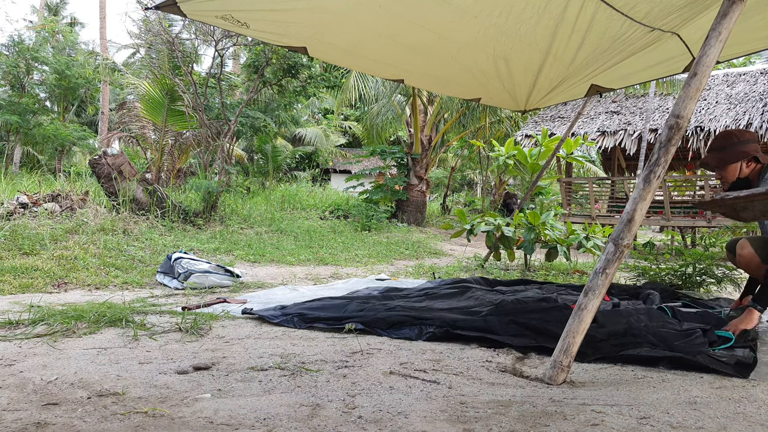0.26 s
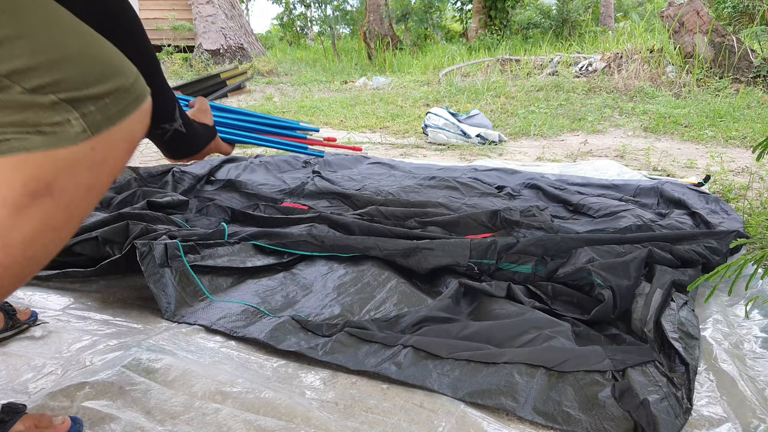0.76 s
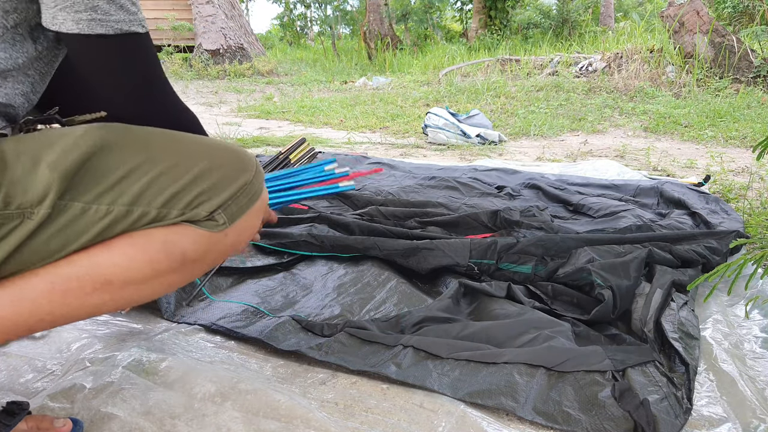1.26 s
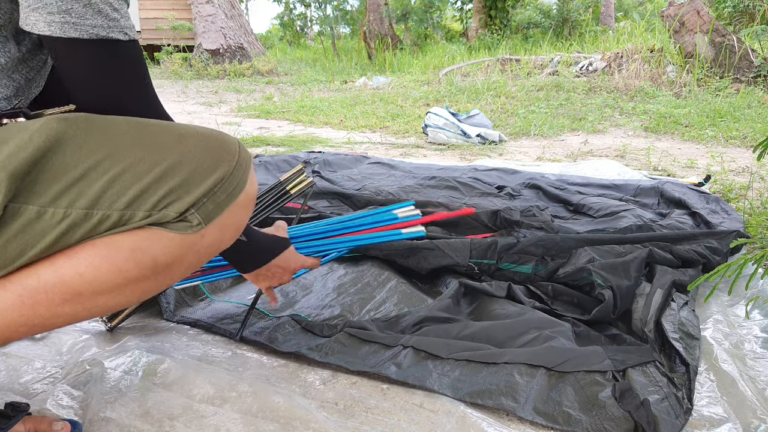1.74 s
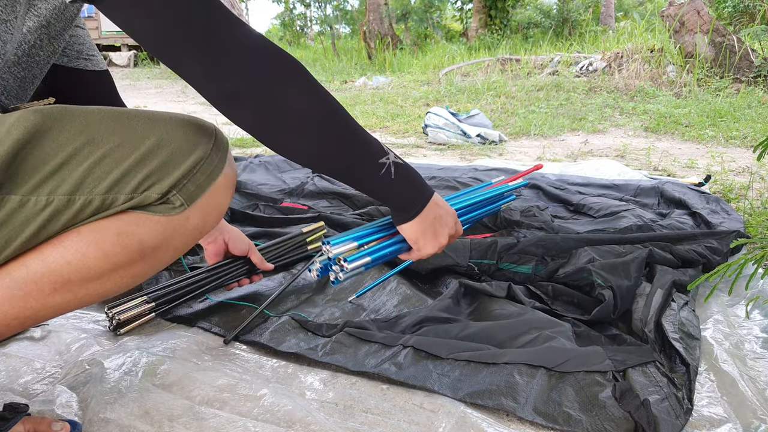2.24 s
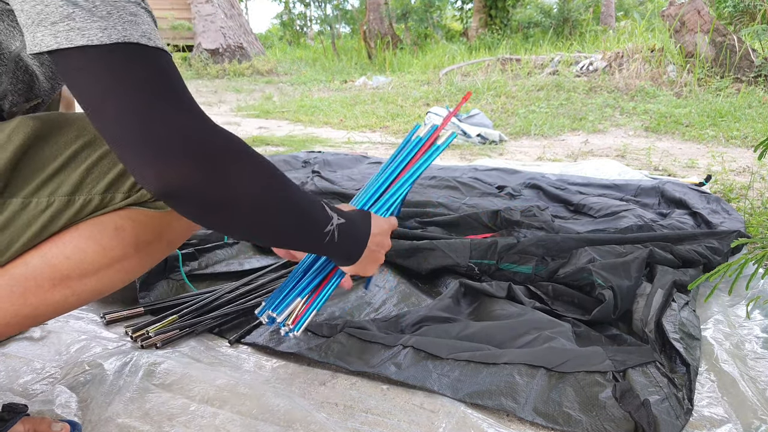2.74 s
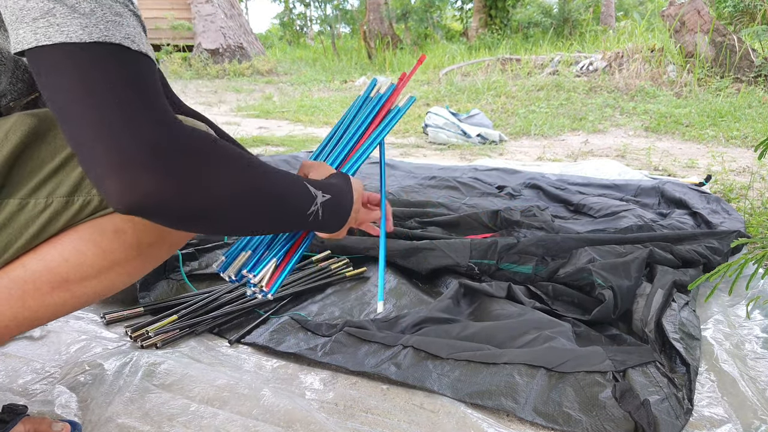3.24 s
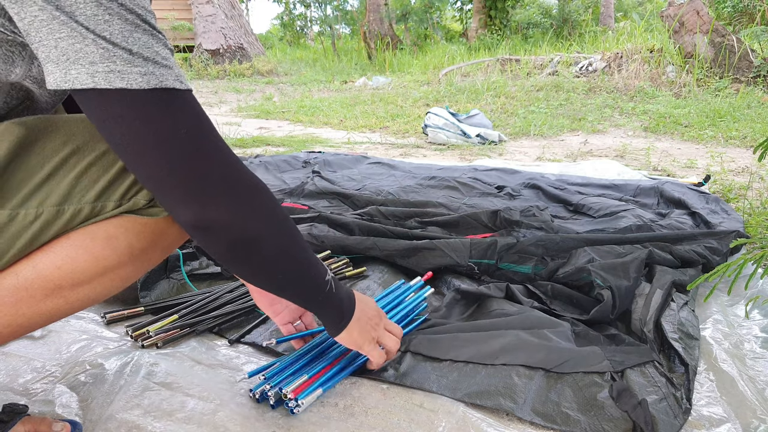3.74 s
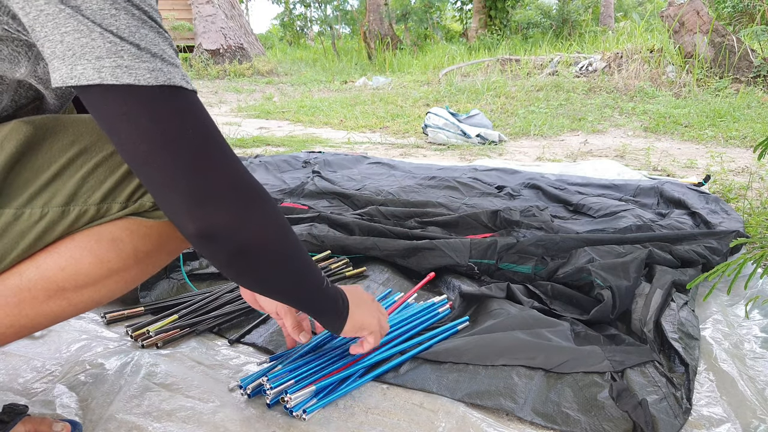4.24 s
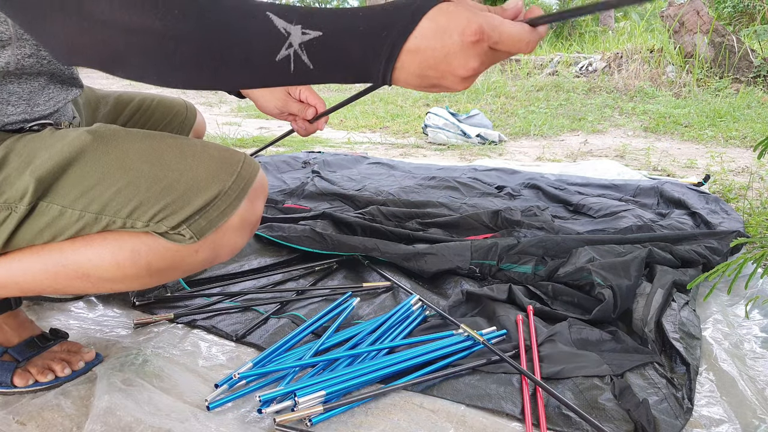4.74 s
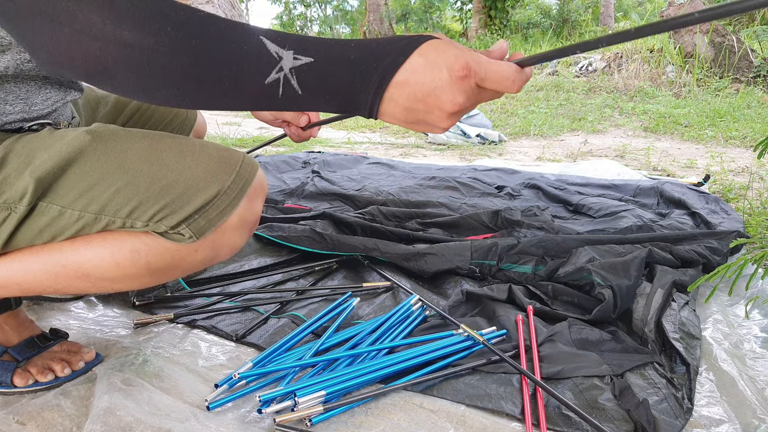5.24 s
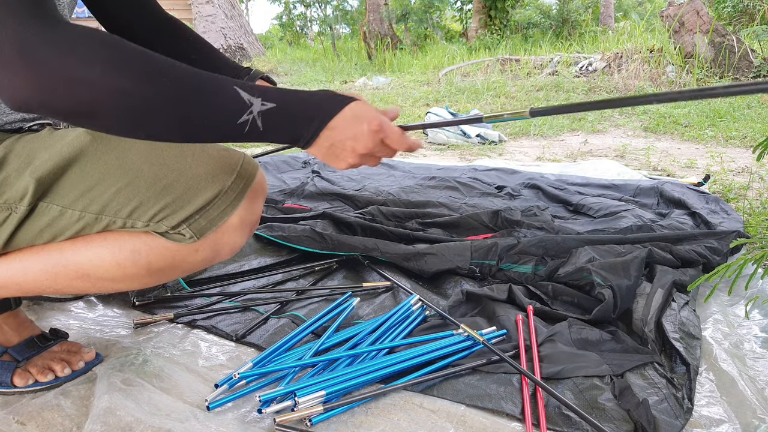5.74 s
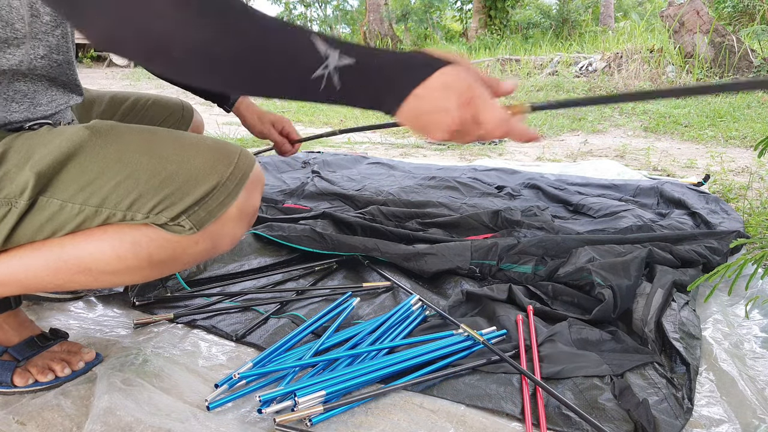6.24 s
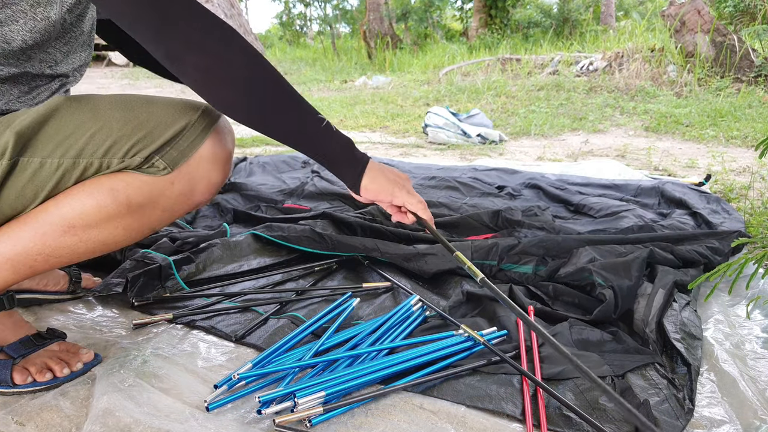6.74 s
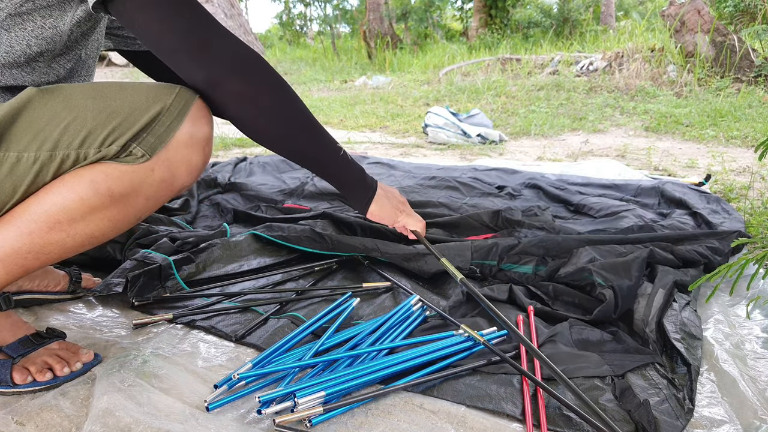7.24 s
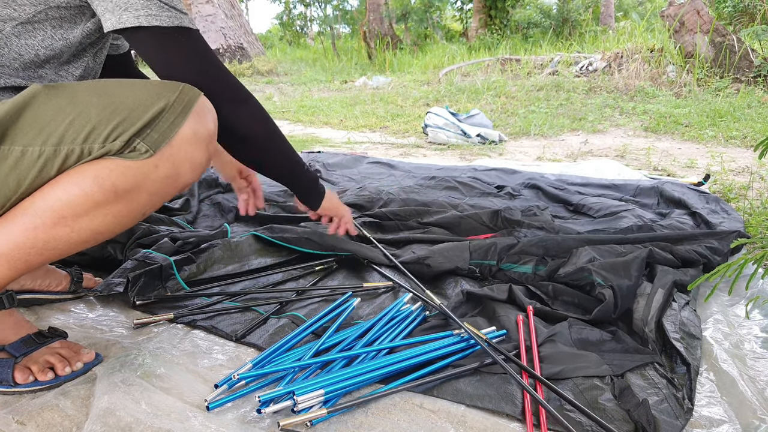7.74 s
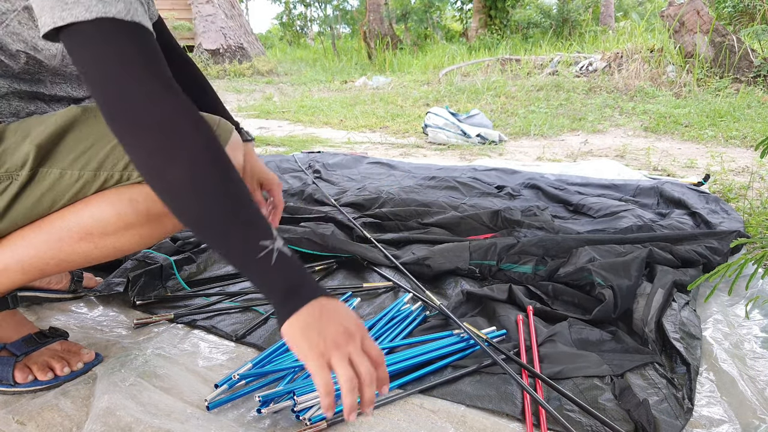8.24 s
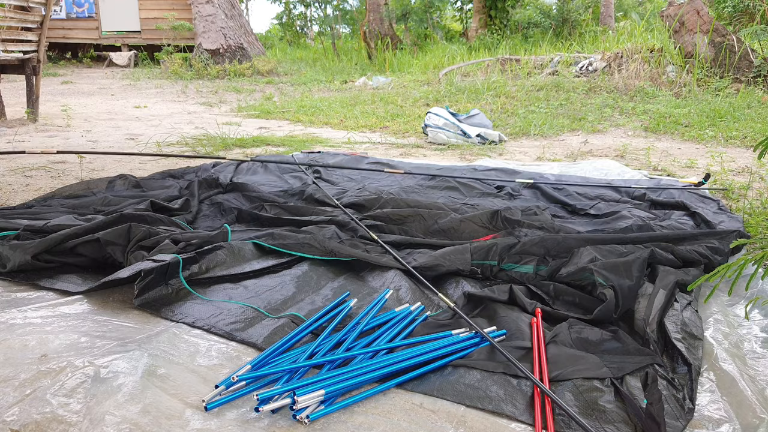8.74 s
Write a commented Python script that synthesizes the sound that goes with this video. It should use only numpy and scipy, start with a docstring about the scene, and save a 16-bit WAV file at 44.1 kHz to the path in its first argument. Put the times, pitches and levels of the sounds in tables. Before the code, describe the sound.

Close, bright clatter of hollow tent poles being sorted and set down in bursts, over steady garden insects, wind in trees and two thin bird whistles.

```python
"""In a tropical garden, folded tent poles are picked up, sorted and dropped on a groundsheet.
The tubes clack (noise bursts with ringing modes), slide and rattle (many tiny touches in a row).
Once let go they lie on the sheet and ring more hollow; the sheet gives a soft swish of noise.
Insects (narrow noise bands) hiss, their level stepping up near the start; air rushes in the trees (noise).
A bird calls twice (gliding tones) and an engine rumbles far off (noise and wavering tones)."""
import sys
import numpy as np
from scipy import signal
from scipy.fft import rfft, irfft
from scipy.io import wavfile

SR = 44100
rng = np.random.default_rng(int(sys.argv[2]) if len(sys.argv) > 2 else 0)


def persist_wave(psi):
    """Save psi, clipped to +-1, as 16-bit WAV."""
    counts = np.round(np.clip(psi, -1, 1) * 32767).astype(np.int16)
    wavfile.write(sys.argv[1], SR, np.atleast_2d(counts).T)


N = 396459
TIME = np.arange(N) / SR
FREQS = np.maximum(np.fft.rfftfreq(N, 1 / SR), 1)
SHORT_SIZE = 8192   # samples in one short sound, such as a touch or a whistle


def from_db(db):
    """Decibels to gain."""
    return 10 ** (np.asarray(db) / 20)


def rms_one(x):
    """Scale to unit rms."""
    return x / np.sqrt(np.mean(x ** 2) + 1e-20)


def level(rows):
    """Gain over time from rows of seconds and dB."""
    return from_db(np.interp(TIME, *np.transpose(rows)))


def at_hz(points, hz):
    """Read a table along a logarithmic frequency axis."""
    freqs, values = np.transpose(points)
    return np.interp(np.log(hz), np.log(freqs), values)


def drift(rate_hz):
    """Slow random wandering with an rms of 1: noise that fades out above rate_hz."""
    spectrum = rfft(rng.standard_normal(N))
    return rms_one(irfft(spectrum / (1 + (FREQS / rate_hz) ** 2), N))


# How alike the two microphones hear the surroundings.
# Each row: frequency in Hz, likeness (0 is unrelated, 1 and above is the same).
LIKENESS = [(60, 1.1), (300, 0.62), (700, 0.64), (1400, 0.44), (3100, 0.21), (7000, 0.04)]
# How the surroundings lean to one side. Each row: frequency in Hz, left minus right in dB.
BALANCE_DB = [(60, -4.5), (110, -8), (200, -7), (380, -1), (700, -0.5), (2400, -1), (4400, -2), (8100, 0),
              (15000, 1)]


def ambience(gain):
    """Stereo noise of the given spectrum, alike in the bass and diffuse in the treble."""
    mid, side = rfft(rng.standard_normal((2, N)))
    alike = np.clip(at_hz(LIKENESS, FREQS), 0, 1)
    signs = np.array([[1], [-1]])   # left, right
    pair = np.sqrt(1 + alike) * mid + np.sqrt(1 - alike) * side * signs
    balance = from_db(signs * at_hz(BALANCE_DB, FREQS) / 2)
    return rms_one(irfft(pair * gain * balance, N))


def swell(s, hold_s, db, rise_db_per_s, fall_db_per_s):
    """Gain that rises to db at time s, holds and dies away."""
    early = np.maximum(s - TIME, 0)
    late = np.maximum(TIME - s - hold_s, 0)
    return from_db(np.maximum(db - rise_db_per_s * early - fall_db_per_s * late, -200))


def add(out, sound, s, pan_db):
    """Mix a short stereo sound in at time s; a negative pan_db leans to the right."""
    start = int(s * SR)
    panned = sound * from_db([[pan_db / 2], [-pan_db / 2]])
    out[:, start:start + SHORT_SIZE] += panned[:, :N - start]


# How the air swells and sinks. Each row: time in seconds, relative level in dB.
RUSH_LEVEL = [(0.0, -63.5), (0.42, -69), (0.77, -50), (1.2, -45.5), (2.0, -49.5), (2.5, -54), (3.5, -59.5),
              (4.15, -58), (4.96, -56), (6.13, -50.5), (8.24, -45.5), (8.99, -48.5)]
# Colour of moving air. Each row: frequency in Hz, relative strength in dB per Hz.
RUSH_COLOUR = [(100, -7), (220, -2.5), (450, 0), (800, -2), (1200, -5.5), (1700, -9), (2500, -11.5),
               (3500, -16.5), (6000, -21), (12000, -35)]


def rush(rush_db=3.5, flutter_db=1.34):
    """Air in the trees is a broad rush of noise that swells and sinks slowly, with a light flutter."""
    flutter = from_db(rush_db + flutter_db * drift(23))
    return level(RUSH_LEVEL) * flutter * ambience(from_db(at_hz(RUSH_COLOUR, FREQS)))


# Brief dips in the background level.
# Each row: start in seconds, hold in seconds, recovery in seconds, full change in dB.
DIPS = [(4.185, 0.23, 0.54, -9.5), (8.248, 0.061, 0.093, -28.5)]
DIP_ONSET_S = 0.02


def dips_db():
    """Twice the background is turned down briefly; this is the full change in dB over time."""
    total = np.zeros(N)
    for s, hold_s, recovery_s, depth_db in DIPS:
        corners = s + np.cumsum([0, DIP_ONSET_S, hold_s, recovery_s])
        total += np.interp(TIME, corners, [0, depth_db, depth_db, 0])
    return total


# Strength of the whole chorus. Each row: time in seconds, relative level in dB.
INSECT_LEVEL = [(0.43, -69), (0.45, -52), (1.5, -48.5), (3.5, -53.5), (4.7, -50), (8.99, -51.5)]
# Shrill bands. Each row: centre in Hz, width in Hz, relative strength in dB.
INSECT_BANDS = [(3670, 270, -5.5), (3910, 470, -1), (4393, 292, 4.5), (11670, 970, -13),
                (12340, 1240, -13.5)]
# Broad hiss under the bands. Each row: frequency in Hz, relative strength in dB per Hz.
INSECT_HISS = [(500, -25), (1500, -3), (3100, -30), (4800, 1), (6200, 3), (7300, 0), (8600, 3.5),
               (9600, -4.5), (11000, -2.5), (14000, -16), (15300, -5)]


def insects(chorus_db=2.5, hiss_db=-19, throb_db=0.9, throb_rate_hz=25):
    """Many insects merge into a few shrill noise bands on a broad hiss."""
    power = from_db(at_hz(INSECT_HISS, FREQS) + hiss_db) ** 2
    for hz, width_hz, band_db in INSECT_BANDS:
        band = from_db(band_db) / (1 + (2 * (FREQS - hz) / width_hz) ** 2)
        power = power + band ** 2
    throb = from_db(chorus_db + throb_db * drift(throb_rate_hz))
    return level(INSECT_LEVEL) * throb * ambience(np.sqrt(power))


# Strength of the far engine. Each row: time in seconds, relative level in dB.
ENGINE_LEVEL = [(0.5, -52), (2.45, -45), (3.0, -51), (4.3, -51.5), (5.6, -48), (8.99, -51)]
# Colour of its rumble. Each row: frequency in Hz, relative strength in dB per Hz.
ENGINE_COLOUR = [(20, -42), (40, -39), (55, -3), (85, 0), (150, -0.5), (185, -9), (330, -7.5), (380, -18.5),
                 (700, -51), (1500, -37)]
# Its tones. Each row: multiple of the firing rate, relative strength in dB.
ENGINE_ORDERS = [(2, 2), (3, -0.5), (5, -3), (7, -4.5), (9, -20), (12, -15), (14, -20)]
FIRING_HZ = 44.72


def engine(tone_db=-6, wander=0.00414, waver_db=1.5, throb_hz=13.3, throb_db=2.0):
    """A dull throbbing rumble with a few wavering multiples of the firing rate, off to the right."""
    phase = 2 * np.pi * np.cumsum(FIRING_HZ * (1 + wander * drift(2.68))) / SR
    tones = np.zeros(N)
    for multiple, db in ENGINE_ORDERS:
        tones += from_db(db + waver_db * drift(4.4)) * np.sin(round(multiple) * phase)
    stereo_tones = rms_one(tones) * from_db(tone_db + np.array([[-4], [3]]))   # left, right
    throb = np.sin(2 * np.pi * throb_hz * TIME + 2 * drift(1.3))
    rumble = from_db(throb_db * throb) * ambience(from_db(at_hz(ENGINE_COLOUR, FREQS)))
    return level(ENGINE_LEVEL) * (rumble + stereo_tones)


# Rising whistles. Each row: start in seconds, length in seconds, first pitch in Hz, last pitch in Hz,
# bend of the glide (1 is straight), relative level in dB.
BIRD = [(4.409, 0.096, 4750, 7500, 1.9, -44.5), (5.69, 0.13, 3700, 7040, 0.8, -45.5)]


def bird(woods_t60_s=0.32, direct=0.37, quaver=0.016):
    """Thin rising whistles are quavering sine glides, smeared by the trees with a decaying noise echo."""
    out = np.zeros((2, N))
    t = np.arange(SHORT_SIZE) / SR
    for s, length_s, first_hz, last_hz, bend, db in BIRD:
        progress = np.clip(t / length_s, 0, 1)
        glide = first_hz + (last_hz - first_hz) * progress ** bend
        hz = glide * (1 + quaver * drift(150)[:SHORT_SIZE])
        envelope = (4 * progress * (1 - progress)) ** 0.12
        whistle = envelope * np.sin(2 * np.pi * np.cumsum(hz) / SR)
        woods = rng.standard_normal((2, SHORT_SIZE)) * from_db(-60 * t / woods_t60_s)
        woods = rms_one(woods) / np.sqrt(SHORT_SIZE)
        smeared = signal.fftconvolve(woods, whistle[None])[:, :SHORT_SIZE]
        add(out, from_db(db) * (direct * whistle + smeared), s, pan_db=-2)
    return out


# An opening hum, then soft thumps.
# Each row: time of full strength in seconds, hold in seconds, relative level in dB.
LOW_SOUNDS = [(0.0, 0.42, -43), (0.658, 0.047, -46), (3.72, 0.054, -46), (4.478, 0.17, -45),
              (8.51, 0.12, -43.5)]
# Their colour. Each row: frequency in Hz, relative strength in dB per Hz.
LOW_COLOUR = [(30, -35), (60, -6.5), (98, 5.5), (120, -4.5), (160, -11), (260, -29), (800, -66)]


def low_sounds(low_db=1, edge_db_per_s=400):
    """Low sounds in short swells of deep noise: an opening hum, then soft thumps."""
    gain = sum(swell(s, hold_s, db, edge_db_per_s, edge_db_per_s) for s, hold_s, db in LOW_SOUNDS)
    return gain * from_db(low_db) * ambience(from_db(at_hz(LOW_COLOUR, FREQS)))


# A foot, then the poles come down on the sheet. Each row: time in seconds, relative level in dB.
LANDINGS = [(0.655, -52.5), (2.42, -42), (3.725, -41.5), (7.725, -41.5)]


def groundsheet(swish_db=3.0, rise_db_per_s=260, fall_db_per_s=170):
    """The cloth gives with a short swish of noise, as dull as the rush of the air."""
    gain = sum(swell(s, 0, db, rise_db_per_s, fall_db_per_s) for s, db in LANDINGS)
    return from_db(swish_db) * gain * ambience(from_db(at_hz(RUSH_COLOUR, FREQS)))


# Pitches at which the bundle of tubes rings. Each row: frequency in Hz, relative strength in dB.
TUBE_MODES = [(1660, 21), (2660, 17.5), (2746, 7), (2815, -10), (4495, -36), (5236, -6.5), (5437, 11),
              (5806, 8), (6378, -15), (6903, -1), (7050, 7), (7281, -7), (8330, 6), (9711, -3), (9983, 8),
              (10745, -1), (11375, 4), (11487, -27), (11760, 3), (12212, -3), (12406, -19), (13183, 10),
              (13527, -1), (13646, -18)]


def tube_ring(t, detune=.0005, series_hz=210):
    """The modes of the bundle, weighted anew by each touch, and the bending series of the struck section."""
    bundle_db, bundle_t60_s, section_db, section_t60_s = -21, .18, -5, .06
    hz, mode_db = np.transpose(TUBE_MODES)
    pitches = hz * (1 + detune * rng.standard_normal(len(hz)))
    weights = from_db(mode_db) * rng.standard_normal((2, len(hz)))
    bundle = rms_one(weights @ np.sin(2 * np.pi * pitches[:, None] * t))
    # a free tube bends at pitches that grow as odd numbers squared; its neighbours damp it quickly
    bends = series_hz * rng.uniform(.85, 1.2) * (np.arange(5, 25, 2) / 3) ** 2
    section = rms_one(rng.standard_normal((2, len(bends))) @ np.sin(2 * np.pi * bends[:, None] * t))
    bundle_fade = from_db(bundle_db - 60 * t / bundle_t60_s)
    return bundle * bundle_fade + section * from_db(section_db - 60 * t / section_t60_s)


def colour(x, spectrum):
    """Causal (minimum-phase) filter for one touch; the energy averages 1 per channel."""
    hz = np.maximum(np.fft.rfftfreq(SHORT_SIZE, 1 / SR), 1)
    cepstrum = irfft(np.log(from_db(at_hz(spectrum, hz))))
    # folding the cepstrum forward puts the energy as early as it can be
    cepstrum[1:] *= 2 * (np.arange(1, SHORT_SIZE) < SHORT_SIZE // 2)
    shaped = irfft(rfft(x) * np.exp(rfft(cepstrum)))
    return rms_one(shaped) / np.sqrt(SHORT_SIZE)


# Colours of the bright, metallic and hollow parts of a touch.
# Each row: frequency in Hz, relative strength in dB per Hz.
BRIGHT = [(2500, -48.5), (3600, -14), (4600, 3), (5600, 4), (7500, 4), (9500, 3), (12000, -1.5),
          (15500, -21.5)]
METAL = [(5000, -30), (8000, -5), (10700, 3.5), (13300, 1.5), (15500, -2)]
HOLLOW = [(150, -6), (450, -23), (1200, -4), (2000, 1), (2800, 5.5), (4200, 11.5), (6000, -22),
          (10000, -54)]


def contact(scatter_db, snap_db=6, snap_t60_s=0.00099, crack_t60_s=0.02, bounce_db=-8, echo_s=0.0069,
            crossfeed=0.15):
    """One touch of two tubes (noise bursts plus their ring), as bright, metallic and hollow parts."""
    t = np.arange(SHORT_SIZE) / SR
    echo_db, echo_t60_s, tail_db, tail_t60_s = -12, .07, -19, .21
    # a hard snap scatters through the joints; the tubes rebound and touch again within milliseconds
    crack = from_db(snap_db - 60 * t / snap_t60_s) + from_db(-60 * t / crack_t60_s)
    rebound_s = rng.uniform(.001, .006)
    rebound = (t > rebound_s) * from_db(bounce_db - 60 * np.abs(t - rebound_s) / crack_t60_s)
    # the ground throws the crack back; bundle and awning keep a short tail going
    echo = (t > echo_s) * from_db(scatter_db + echo_db - 60 * np.abs(t - echo_s) / echo_t60_s)
    tail = from_db(scatter_db + tail_db - 60 * t / tail_t60_s)
    envelope = np.sqrt(crack ** 2 + rebound ** 2 + echo ** 2 + tail ** 2)
    touch = rng.standard_normal((2, SHORT_SIZE)) * envelope + tube_ring(t)
    # the long waves of the hollow part reach both microphones more alike
    blended = touch + crossfeed * touch[::-1]
    return colour(touch, BRIGHT), colour(touch, METAL), colour(blended, HOLLOW)


# Sections slide over each other. Each row: start in seconds, swell in seconds, settling in seconds,
# relative bright level in dB, metallic part against the bright in dB, relative hollow level in dB.
SLIDES = [(0.468, 0.011, 0.12, -43, -5, -49.5), (0.55, 0.043, 0.29, -24, -10, -35),
          (0.81, 0.01, 0.25, -47.5, 6, -62), (1.21, 0.06, 0.17, -29.5, -8, -36.5),
          (1.37, 0.065, 0.11, -35.5, -5, -47), (1.52, 0.035, 0.2, -36.5, -8, -44),
          (1.604, 0.039, 0.041, -25, -9, -38.5), (2.403, 0.028, 0.12, -14, -0.5, -34),
          (2.52, 0.039, 0.24, -26, -4, -45), (3.645, 0.0075, 0.51, -20.5, -2, -28.5),
          (3.714, 0.024, 0.15, -10.5, -1, -21), (3.985, 0.013, 0.057, -42, -5, -42),
          (4.07, 0.018, 0.17, -39.5, -7, -44.5), (4.325, 0.031, 0.013, -31, -2, -37),
          (6.0, 0.013, 0.24, -40, -1, -41.5), (6.19, 0.015, 0.15, -39, -4, -42.5),
          (7.692, 0.012, 0.12, -19.5, -4, -26.5)]
SWELL_DB, SETTLE_DB = 8.5, 30   # how far a slide rises to its peak and sinks after it


def rattle(per_s=220, spread_db=6.0, bright_db=-4, hollow_db=-2, pan_db=-2.0, count=24):
    """Sliding sections touch hundreds of times a second, each time with another force."""
    out = np.zeros((2, N))
    sections = [contact(scatter_db=-2) for _ in range(count)]
    for start, swell_s, settle_s, high_db, top_db, low_db in SLIDES:
        draws = rng.random((int((swell_s + settle_s) * per_s), 3))   # lateness, force, which section
        forces = from_db(spread_db * np.minimum(np.log(1 / draws[:, 1]), 2))
        forces = rms_one(forces) * np.sqrt(SR / per_s)
        for k, (late, _, which) in enumerate(draws):
            age = (k + late) / per_s
            effort_db = np.interp(age, [0, swell_s, swell_s + settle_s], [-SWELL_DB, 0, -SETTLE_DB])
            bright, metal, hollow = sections[int(which * count)]
            treble = from_db(high_db + bright_db) * (bright + from_db(top_db) * metal)
            body = from_db(low_db + hollow_db) * hollow
            add(out, forces[k] * from_db(effort_db) * (treble + body), start + age, pan_db)
    return out


# Knocks that stand out. Each row: time in seconds, relative strength in dB,
# metallic top against that strength in dB.
CLACKS = [(0.545, -17.5, -15), (0.5798, -10.5, -15), (0.623, -13, -10), (0.6684, -22, -18),
          (0.6784, -12.5, -21), (0.9151, -19, -15), (0.9463, -15.5, -8), (1.2166, -20.5, -10.5),
          (1.255, -9.5, -15), (1.3279, -7, -13), (1.3598, -14, -19), (1.484, -16, -12.5),
          (1.6192, -17.5, -8), (1.6392, -13, -14), (1.7514, -22.5, -12), (1.8305, -22, -17),
          (2.4008, -6.5, -13), (2.4116, -2, -7.5), (2.4268, -12, 1.5), (2.446, -6.5, -6.5),
          (2.4674, -12, -15), (2.5246, -13, -8.5), (2.5581, -8.5, -11), (2.589, -13.5, -17),
          (2.6643, -16.5, -13.5), (2.6818, -18.5, -19), (3.6087, -15.5, -16), (3.643, -8, -13),
          (3.7171, -6, -10), (3.7574, -6, -5.5), (3.8292, -19, -18), (3.872, -21.5, -21),
          (3.922, -22.5, -16), (3.9897, -16.5, -9.5), (4, -13.5, -30), (4.318, -28, -9.5),
          (4.334, -24, -17), (4.3468, -14.5, -14), (4.841, -32, -19), (5.4068, -21, -17),
          (5.5408, -27.5, -18), (6.2436, -23.5, -17), (7.6904, -2.5, -13), (7.6973, -10.5, -9),
          (7.7596, -16.5, -19), (7.792, -20, -21), (7.8, -20, -14), (7.825, -23, -21),
          (7.8787, -24.5, -14.5), (8.5616, -24.5, -22)]
# a gripping hand damps the hollow body of the tubes; later they lie free, further to the right
LET_GO_S = 3.5
GRIPPED_BODY_DB, FREE_BODY_DB = -10.5, 3   # hollow body under a knock of 0 dB
GRIPPED_FOLLOWS, FREE_FOLLOWS = 0.45, 0.83   # dB of body per dB of knock: light knocks sound hollower
GRIPPED_PAN_DB, FREE_PAN_DB, PAN_SPREAD_DB = -1.5, -3.5, 1.5   # left minus right


def clacks(bright_db=12, metal_db=26):
    """The distinct knocks: tip on tip is metallic, and tubes that lie free ring hollow."""
    out = np.zeros((2, N))
    for s, knock_db, top_db in CLACKS:
        if s < LET_GO_S:
            body_db, pan_db = GRIPPED_BODY_DB + GRIPPED_FOLLOWS * knock_db, GRIPPED_PAN_DB
        else:
            body_db, pan_db = FREE_BODY_DB + FREE_FOLLOWS * knock_db, FREE_PAN_DB
        bright, metal, hollow = contact(scatter_db=5)
        treble = from_db(knock_db) * (from_db(bright_db) * bright + from_db(top_db + metal_db) * metal)
        body = from_db(body_db) * hollow
        add(out, treble + body, s, pan_db + PAN_SPREAD_DB * rng.standard_normal())
    return out


def scene():
    """Poles close by, the garden all around."""
    dips = dips_db()
    dip_share = 0.079   # the rush is turned down fully, insects and engine by this share in dB
    garden = from_db(dips) * rush() + from_db(dip_share * dips) * (insects() + engine()) + bird()
    return garden + low_sounds() + groundsheet() + rattle() + clacks()


def record(dry):
    """The deepest bass is cut, the highest peaks are rounded and the top is cut."""
    bass_cut = signal.butter(2, 30, "high", fs=SR, output="sos")
    top_cut = signal.ellip(10, .1, 80, 15550, fs=SR, output="sos")   # steep cut at 15550 Hz
    rounded = np.tanh(signal.sosfilt(bass_cut, dry))
    return signal.sosfilt(top_cut, rounded)


dry = scene()
out = record(dry)
persist_wave(out)
```